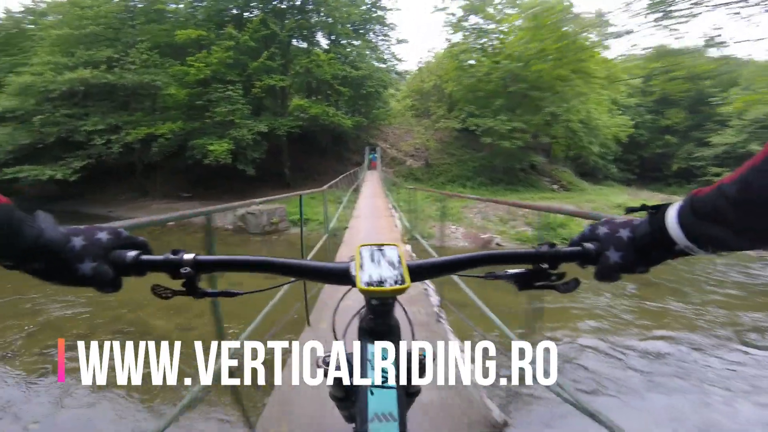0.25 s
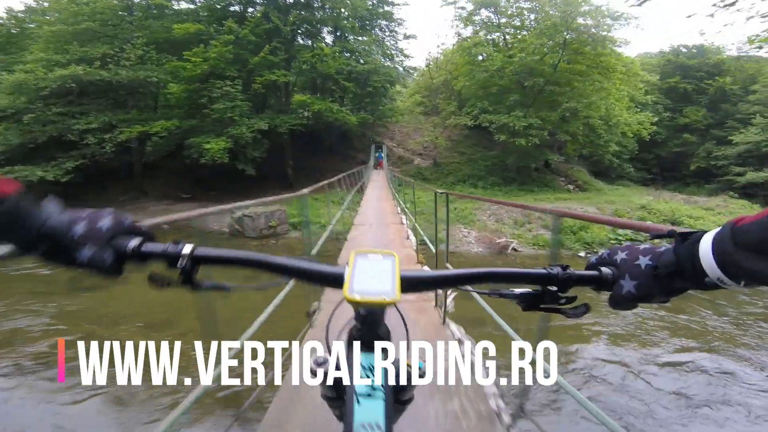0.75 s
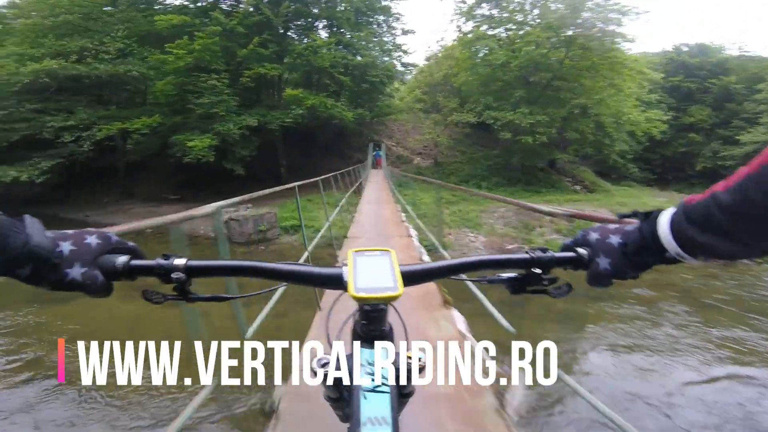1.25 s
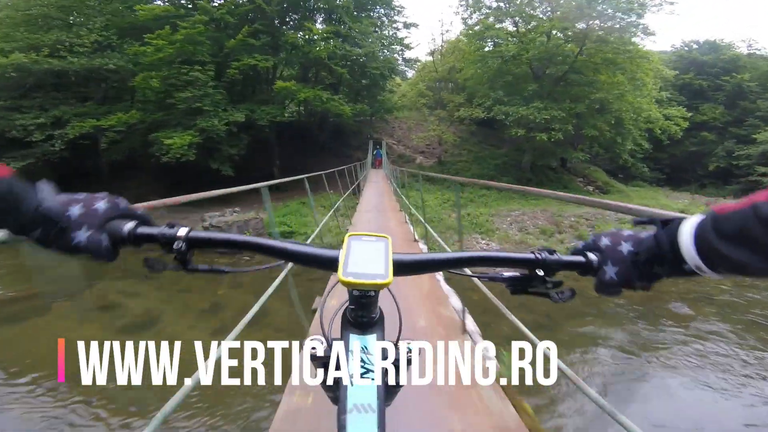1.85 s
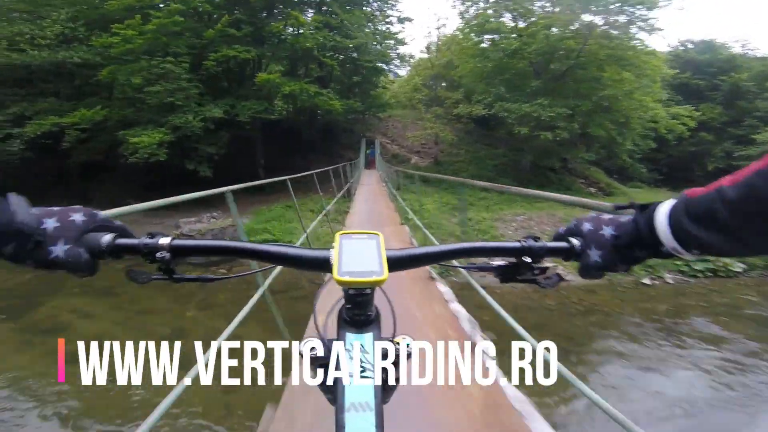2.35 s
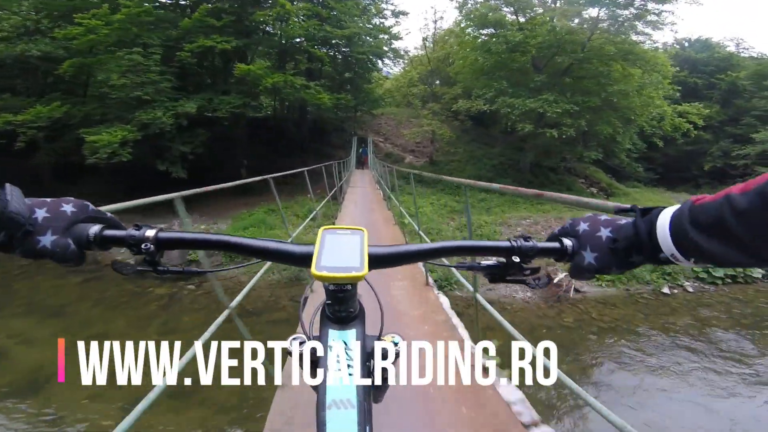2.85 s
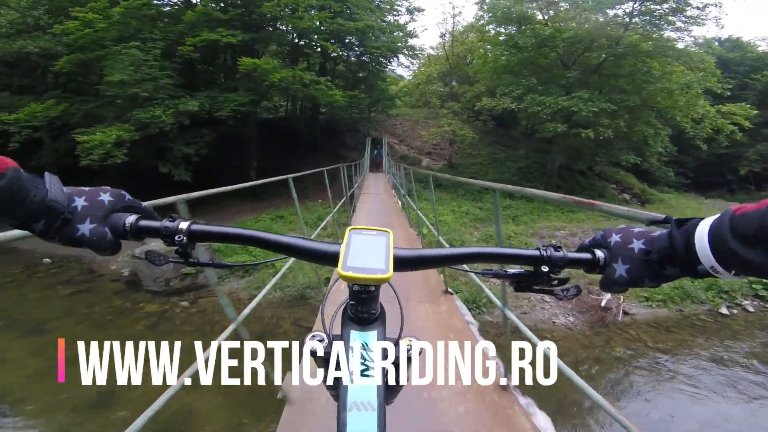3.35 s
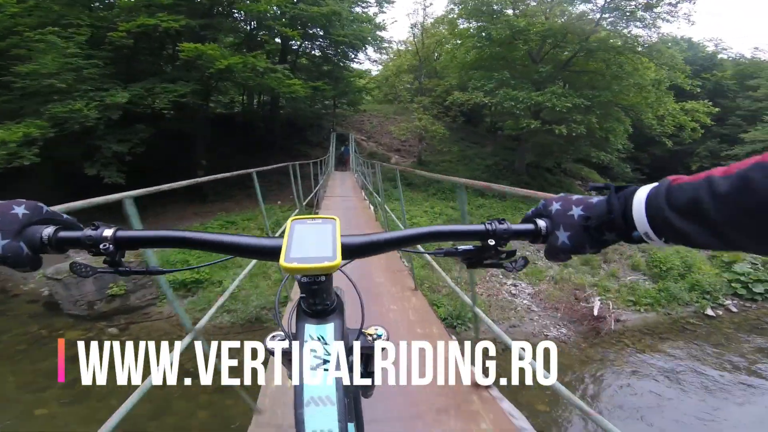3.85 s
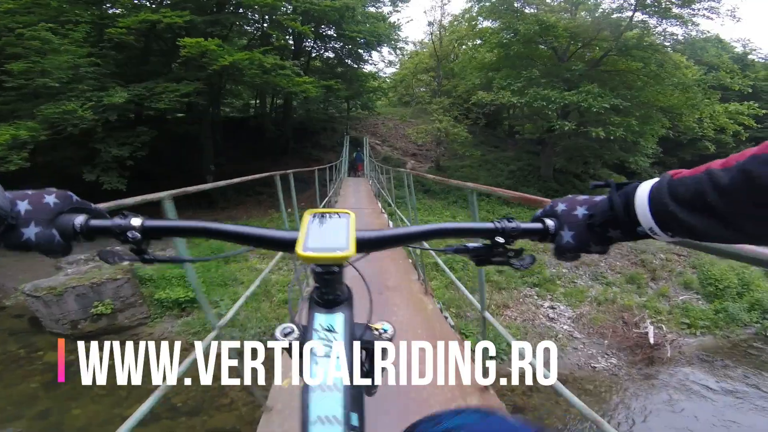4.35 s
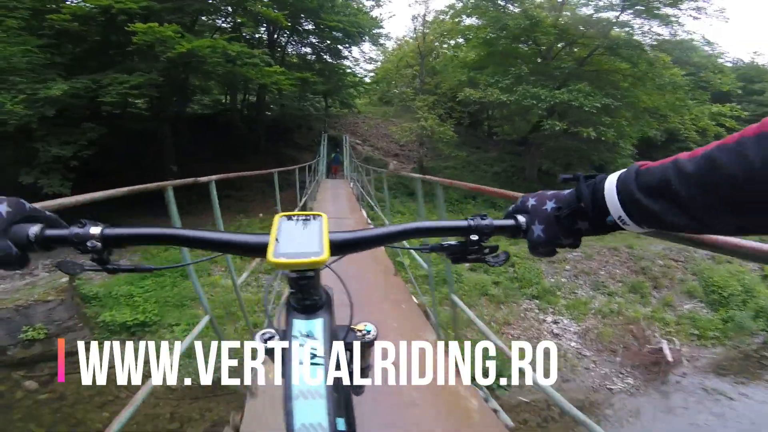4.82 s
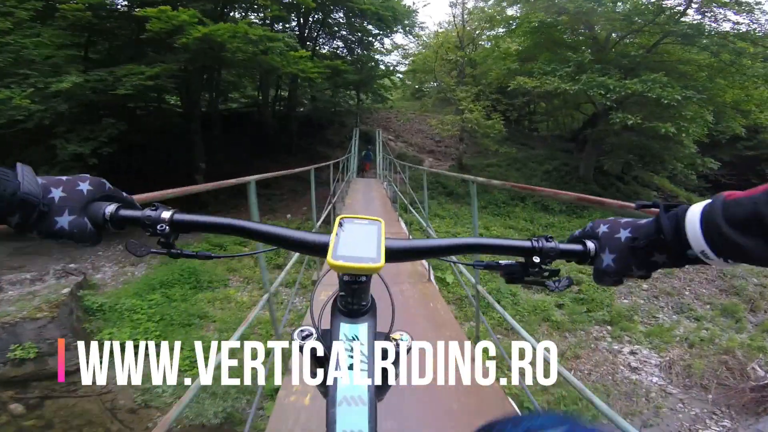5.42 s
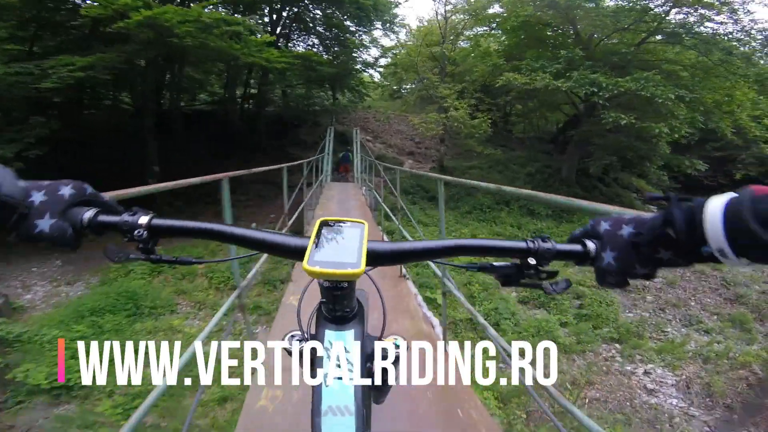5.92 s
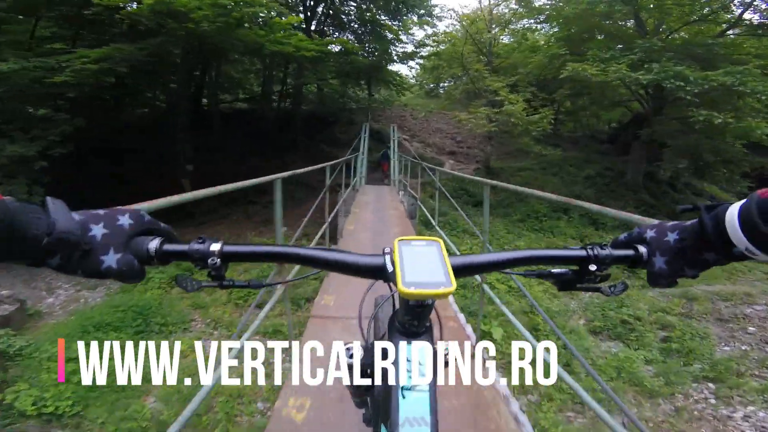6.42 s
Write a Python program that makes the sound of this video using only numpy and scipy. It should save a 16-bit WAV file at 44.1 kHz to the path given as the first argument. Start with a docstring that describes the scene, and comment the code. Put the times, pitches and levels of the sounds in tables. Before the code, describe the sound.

A mountain bike coasts over a loose steel footbridge, freewheel ticking, plates thumping and chain rattling, with two quick ratchet buzzes before the hardest jolts.

```python
"""A mountain bike coasts over the loose steel plates of a footbridge, heard by a boxed camera on the rider.
At first the freewheel ticks while plate joints thump the deck and shake the chain and cables; past four
seconds fast back-pedalling makes it buzz, then the ticking stops. It buzzes briefly again after five seconds,
and the hardest jolts follow. Shaped noise makes tyre rumble, a soft hiss of air and river, and wind throughout.
Ticks and rattles are short noise bursts sent through resonances; snaps and deck booms are dying tones."""
import sys
import numpy as np
from scipy import signal
from scipy.io import wavfile
from scipy.ndimage import uniform_filter1d

SR = 44100
rng = np.random.default_rng(int(sys.argv[2]) if len(sys.argv) > 2 else 0)


def materialize(psi):
    """Save the field psi as 16-bit PCM at rate SR to the path in sys.argv[1].

    A 1-D psi becomes a single channel; in a 2-D psi each row is a channel.
    """
    bounded = np.clip(np.atleast_2d(psi).T, -1, 1)
    quanta = np.round(bounded * 32767).astype(np.int16)
    wavfile.write(sys.argv[1], SR, quanta)


N = 294411

# Levels in the tables are those of each part before the later mix gains and the camera box.
# loudness of a freewheel tick over time: time_s, level_db
TICK_LEVELS = [(0, -41.5), (1.5, -38.5), (1.9, -45), (2.3, -43.5), (3.5, -41), (4.36, -40), (4.39, -35.5),
               (5.43, -37.5)]
# spans with no push on the pedals, in which the ratchet is heard: start_s, end_s
COASTING_SPANS = [(0, 4.4), (5.14, 5.435)]
# the feet rock the pedals; each move starts and ends gently: start_s, length_s, teeth_backwards (count)
PEDAL_MOVES = [(0, .07, -1.2), (.09, .19, 1.05), (.28, .2, -.95), (.43, .27, -3.55), (.73, .135, 1.95),
               (.87, .15, -1.85), (1.02, .19, 1.25), (1.43, .17, -.82), (1.83, .1, .37), (1.93, .19, -2.1),
               (2.13, .15, 1.75), (3.01, .1, .48), (3.48, .2, -1.53), (3.78, .12, -.5), (4.03, .37, 21.9),
               (5.08, .36, 21.14)]
# tone colour of the falling pawls: pitch_hz, level_db
PAWL_COLOUR = [(1500, -23), (3000, -13), (4200, 6.5), (6500, 11.5), (9000, 7.5), (16000, -5)]
# ringing of the wheel hub: pitch_hz, width_hz, level_db
HUB_MODES = [(1627, 75, -4.5), (2096, 540, 8), (3120, 69, -3), (6960, 180, -8)]
# jolts that shake chain and cables: start_s, rattle_peak_db, deck_thump_db, rattle_t60_s (time to fall 60 dB)
JOLTS = [(0.1197, -15, -29, 0.11), (0.2721, -20, -29, 0.12), (0.383, -26, -33.5, .09),
         (0.6839, -7.5, -22.5, 0.11), (0.69, -12.5, -27, 0.088), (0.8585, -23.5, -37, 0.13),
         (1.2987, -15, -30.5, 0.09), (1.4627, -19, -41, 0.043), (1.5793, -8.5, -22.5, 0.1),
         (1.613, -7, -29.5, .11), (1.6674, -9.5, -36, 0.1), (1.694, -19, -28.5, 0.087),
         (1.9001, -26.5, -44, 0.08), (1.9377, -21, -37.5, 0.12), (1.947, -23.5, -43, 0.1),
         (2.0166, -18, -45, 0.082), (2.09, -20.5, -40.5, 0.082), (2.513, -14, -28.5, 0.17),
         (2.53, -20.5, -26.5, 0.13), (2.641, -29, -27, 0.16), (2.6615, -9, -26.5, 0.11),
         (2.7353, -9, -30.5, 0.12), (3.1429, -13.5, -22.5, 0.19), (3.195, -17.5, -40, 0.25),
         (3.213, -22, -30.5, 0.1), (3.23, -25, -30, 0.27), (3.2767, -32, -28.5, 0.59),
         (3.358, -28, -31, .45), (4.578, -40, -40.5, 0.086), (4.697, -10.5, -22.5, 0.14),
         (4.734, -28, -39, 0.23), (4.8258, -13.5, -21.5, 0.18), (4.9, -24, -62, 0.14),
         (4.945, -20, -49, 0.18), (5.0117, -16, -30.5, 0.18), (5.0672, -15.5, -26.5, 0.11),
         (5.1157, -15, -28, 0.14), (5.142, -23.5, -28, 0.25), (5.501, -33, -33, 0.081),
         (5.552, -21.5, -38, 0.11), (5.7051, -6.5, -15, 0.063), (5.7385, -9.5, -18.5, 0.069),
         (5.796, -12, -20.5, 0.037), (5.8178, -5, -15, 0.13), (5.9117, -16, -22.5, 0.13),
         (6.064, -6.5, -18.5, 0.15), (6.145, -22.5, -22, 0.71), (6.225, -26, -32, .15),
         (6.249, -21.5, -27.5, 0.17), (6.292, -24, -42, 0.17), (6.342, -1.5, -14.5, 0.22),
         (6.3891, -19, -19, 0.28), (6.46, -30.5, -49, 0.99), (6.529, -28, -40, 0.27),
         (6.581, -24, -40, 0.1), (6.599, -30, -43, 0.079), (6.6664, -28.5, -37, .15)]
# single sharp snaps of a link on metal: start_s, peak_db, pitch_hz
SNAPS = [(1.603, -7, 5320), (1.6138, -2, 5940), (1.6669, -2, 5560), (4.7015, -24, 5920),
         (5.0653, -10.5, 5740), (5.8252, 1, 6500), (6.4822, -12, 5450)]
# tone colour of the bright rattle: pitch_hz, level_db
RATTLE_COLOUR = [(1500, -14), (3000, 2.5), (4500, -0.5), (9000, 6.5), (16000, 0.5)]
# ringing of chain and frame: pitch_hz, width_hz, level_db
METAL_MODES = [(2730, 110, -12), (5010, 36, -6), (5270, 23, -3), (5620, 82, -12), (5890, 160, 5),
               (6525, 130, 1), (7060, 110, 0)]
# tone colour of the dull clatter: pitch_hz, level_db
CLATTER_COLOUR = [(150, -30), (500, 5), (1200, -0.5), (2800, -2.5), (5000, -11.5), (10000, -17)]
# bending modes of the deck and tyres: pitch_hz, width_hz, level_db
DECK_MODES = [(95.1, 20.3, 9), (137.6, 30, -1), (195.5, 43, -9), (271, 25, -6), (504, 7.2, -14)]
# dull knocks of the frame: start_s, peak_db, pitch_hz, width_hz, t60_s, clean_share (of one clean blow, 0-1)
KNOCKS = [(1.299, -11, 1260, 1600, 0.038, 0.76), (2.06, -31.5, 395, 400, 0.096, 0.53),
          (2.196, -29, 540, 600, 0.19, 0.72), (4.441, -29, 580, 357, 0.19, 0.43),
          (5.378, -17, 2180, 1490, 0.054, 0.73), (5.2, -32, 674, 250, 0.12, 0.23),
          (5.495, -28.5, 600, 242, 0.4, 0.32), (5.5, -34.5, 1280, 260, 0.2, 0.06),
          (5.639, -24, 900, 120, 0.031, 0.1)]
# rolling over time: time_s, tyre_rumble_db, hiss_db
ROLLING_LEVELS = [(0.0, -38.5, -49.5), (0.69, -47, -47), (0.85, -38.5, -53), (1.21, -42, -42),
                  (1.71, -39.5, -52.5), (2.32, -41.5, -54), (2.57, -44.5, -48), (2.69, -40, -45),
                  (3.03, -42, -49), (3.36, -36.5, -75), (3.77, -42, -44), (4.63, -39, -51.5),
                  (4.96, -33.5, -45), (5.62, -39, -48), (5.91, -22.5, -89), (6.68, -35, -71)]
# tone colour of the rumble: pitch_hz, level_db
RUMBLE_COLOUR = [(30, 2), (75, -23), (120, -4), (300, -6), (700, -21), (1500, -26.5), (4000, -37)]
# tone colour of the hiss: pitch_hz, level_db
HISS_COLOUR = [(200, -4.5), (600, -1), (1500, -6), (3000, -8), (4000, -15.5), (5000, -16), (9000, -12),
               (16000, -6)]
# low gusts on the microphone: peak_s, level_db
GUSTS = [(.15, -31), (.3, -44), (.48, -39), (0.719, -29.5), (1.04, -37), (1.62, -42), (1.77, -48),
         (2.099, -43), (2.55, -38), (2.85, -43), (3.16, -35.5), (3.51, -37.5), (3.659, -40), (3.85, -67),
         (4.22, -49), (5.11, -34), (5.35, -38.5), (5.558, -37), (5.73, -28), (5.82, -27), (6.12, -33.5),
         (6.42, -30), (6.55, -49)]
# the camera box favours two cavity peaks and shuts out the top: pitch_hz, level_db
BOX_COLOUR = [(2000, -1), (2800, 0), (4200, -1.5), (4900, 4.5), (5500, 8), (6000, 4), (6450, 8), (7000, 1),
              (8000, -5.5), (10000, -14.5), (11800, -31.5), (13400, -29.5), (16000, -35)]

# Freewheel: the wheel turns the ratchet steadily, and the swish trails the rate of passing teeth
WHEEL_TEETH_PER_S, FIRST_TOOTH = 40.5, -.1
WHIRR_REST_HZ, WHIRR_HZ_PER_TOOTH_RATE, WHIRR_WIDTH_HZ = 1300, 8, 140
WHIRR_LAG_S, WHIRR_DB_AT_120_TEETH_PER_S = .07, 13

# Jolts: the clatter level lies between rattle and thump (share of the thump), plus an offset
CLATTER_SHARE, CLATTER_DB = 0.31, -6.5
# the chain slaps on at random while the deck shudders
SLAPS_PER_S, SLAP_DB, SLAP_T60_S = 70, -11, 0.075
BOOM_SPREAD_DB = 5  # each blow falls elsewhere and favours other modes
BANK_S, BANK_LOW_MODE_DB = 5.6, -8  # near the bank the lowest deck mode weakens
# slow after-shake of the deck: levels relative to the thumps
SHUDDER_T60_S, SHUDDER_RUMBLE_DB, SHUDDER_JINGLE_DB = 1.06, -16, -20.5

BLOW_DAMPING = 1.1  # nepers per cycle of a clean frame knock

# Background
CHAIN_HISS_DB = -43  # at full back-pedalling speed: teeth pass at three times the wheel's own rate
COAST_HISS_DB = -58  # the free ratchet also sizzles between its ticks
CALM_WIND_DB, GUST_RISE_DB_PER_S, GUST_FALL_DB_PER_S = -47.5, 157, 78

BAND_EDGE_HZ = 15950


def freewheel():
    """Each tooth drops the pawls as a tiny noise burst that rings the hub; fast teeth add a rising swish."""
    passed, free = teeth()
    new_tooth = np.diff(np.floor(passed), prepend=-1) > 0
    times = np.flatnonzero(new_tooth & free) / SR
    scatter = rng.standard_normal((len(times), 2))
    tick_db = np.interp(times, *np.transpose(TICK_LEVELS))

    t, envelope = np.arange(2000) / SR, np.zeros(N)
    shape = (1 - np.exp(-t / .001)) * (np.exp(-t / .0028) + .08 * np.exp(-t / .01))
    for at, db, (late, size) in zip(times, tick_db, scatter):
        # each burst starts about 2.2 ms ahead of its tooth and varies a little in time and loudness
        add(envelope, at - .0022 + .0004 * late, gain_of(db + 1.3 * size) * shape)
    clicks = envelope * rng.standard_normal(N)

    teeth_per_s = uniform_filter1d(np.gradient(passed) * SR * free, size=6000)
    lagging_rate = np.roll(teeth_per_s, round(WHIRR_LAG_S * SR))
    whirr_hz = WHIRR_REST_HZ + WHIRR_HZ_PER_TOOTH_RATE * lagging_rate
    whirr = ring(clicks, whirr_hz, WHIRR_WIDTH_HZ) * (teeth_per_s / 120)
    pawls = colour(clicks, PAWL_COLOUR)
    hub = gain_of(-5) * modes(clicks, HUB_MODES)
    return pawls + hub + gain_of(WHIRR_DB_AT_120_TEETH_PER_S) * whirr


def teeth():
    """Teeth passed so far (steady wheel plus pedal moves), and where the ratchet runs free."""
    t, coarse = np.arange(N) / SR, np.arange(0, N + 16, 16) / SR
    moves = np.zeros(len(coarse))
    for start, length, back in PEDAL_MOVES:
        progress = np.clip((coarse - start) / length, 0, 1)
        moves += back * (.5 - .5 * np.cos(np.pi * progress))
    passed = FIRST_TOOTH + WHEEL_TEETH_PER_S * t + np.interp(t, coarse, moves)
    free = sum((t >= start) & (t < end) for start, end in COASTING_SPANS) > 0
    return passed, free


def jolts():
    """A gritty dying rattle, its dull clatter, and a slower thump in which the deck modes boom."""
    t = np.arange(SR // 2) / SR
    shake, clatter, thump_power, booms, snaps = np.zeros((5, N))
    favours = BOOM_SPREAD_DB * rng.standard_normal((len(JOLTS), len(DECK_MODES)))
    favours[:, 0] += BANK_LOW_MODE_DB * (np.array(JOLTS)[:, 0] > BANK_S)
    deck_hz, _, deck_db = np.transpose(DECK_MODES)
    tones = np.sin(2 * np.pi * deck_hz[:, None] * t)
    for (s, db, thump_db, t60), favour_db in zip(JOLTS, favours):
        envelope = gain_of(-60 * t / t60) * (1 - np.exp(-t / 0.0015))
        clatter_db = CLATTER_DB + db + CLATTER_SHARE * (thump_db - db)
        add(shake, s, gain_of(db) * envelope)
        add(clatter, s, gain_of(clatter_db) * envelope)
        # thumps add as powers, so their decibels are doubled here and the root is taken below
        add(thump_power, s, gain_of(2 * thump_db - 120 * t / 0.5) * (1 - np.exp(-t / 0.0004)))
        add(booms, s, gain_of(thump_db - 60 * t / 0.67) * (gain_of(deck_db + favour_db) @ tones))

    slap_starts = rng.random(N) < SLAPS_PER_S / SR
    hits = slap_starts * gain_of(SLAP_DB + 1.2 * rng.standard_normal(N)) * shudder()
    slaps = signal.oaconvolve(hits, gain_of(-60 * t / SLAP_T60_S))[:N]
    for s, db, hz in SNAPS:
        add(snaps, s, gain_of(db) * np.sin(2 * np.pi * hz * t) * np.exp(-t / 0.00063))

    # many links striking
    grit = evened(rng.standard_normal((2, N)) * lumps(per_s=420, spread_db=3))
    strikes = gain_of(-14) * (shake + slaps) * grit[0] + gain_of(-11.0) * snaps
    rattle = colour(strikes, RATTLE_COLOUR) + gain_of(-15.5) * modes(strikes, METAL_MODES)
    dull = colour((clatter + gain_of(-14.5) * slaps) * grit[1], CLATTER_COLOUR)
    deck = gain_of(-2.0) * np.sqrt(thump_power) * deck_noise() + gain_of(-20) * booms
    return rattle + gain_of(-1.35) * dull + deck


def shudder():
    """Amplitude of the deck's slow after-shake: the powers of all thumps add and die away."""
    power = np.zeros(N)
    for s, _, thump_db, _ in JOLTS:
        power[round(s * SR)] += gain_of(2 * thump_db)
    return np.sqrt(signal.lfilter([1], [1, -gain_of(-120 / (SHUDDER_T60_S * SR))], power))


def deck_noise():
    """Broad rumble with the bending modes of the deck and tyres standing out."""
    noise = rng.standard_normal(N)
    near_bank = np.clip((np.arange(N) / SR - BANK_S) / .2, 0, 1)
    lowest = gain_of(BANK_LOW_MODE_DB * near_bank) * modes(noise, DECK_MODES[:1])
    bending = lowest + modes(noise, DECK_MODES[1:])
    return evened(evened(colour(noise, RUMBLE_COLOUR)) + gain_of(5.0) * evened(bending))


def knocks():
    """The frame gives a quickly damped blow and a grainy puff of noise around its pitch."""
    t, out = np.arange(8000) / SR, np.zeros(N)
    for s, db, hz, width, t60, clean in KNOCKS:
        puff = evened(ring(ring(rng.standard_normal(len(t)), hz, width), hz, 2.0 * width))
        dying_puff = puff * gain_of(-60 * t / t60)
        blow = -1.9 * np.sin(2 * np.pi * hz * t) * np.exp(-t * hz * BLOW_DAMPING)
        add(out, s, gain_of(db) * (clean * blow + 1.22 * (1 - clean) * dying_puff))
    return out


def rolling():
    """Lumpy tyre rumble and a fluttering hiss that swell with shudder, hiss also with pedalling; plus wind."""
    passed, free = teeth()
    backwards = np.clip(np.gradient(passed) * SR / WHEEL_TEETH_PER_S - 1, 0, 2) / 2 * free  # 0-1
    shaking = uniform_filter1d(shudder(), size=2000)
    low = np.hypot(gain_of(curve(ROLLING_LEVELS, axis=1)), gain_of(SHUDDER_RUMBLE_DB) * shaking)
    rumble = low * deck_noise() * lumps(per_s=6.7, spread_db=2.0)

    high = gain_of(curve(ROLLING_LEVELS, axis=2))
    high = high + gain_of(SHUDDER_JINGLE_DB) * shaking
    high = high + gain_of(CHAIN_HISS_DB) * backwards
    high = high + gain_of(COAST_HISS_DB) * uniform_filter1d(free * 1., size=800)
    fluttering = rng.standard_normal(N) * lumps(per_s=70, spread_db=1.2)
    hiss = evened(colour(fluttering, HISS_COLOUR))

    buffet = evened(ring(ring(rng.standard_normal(N), 31.0, 25), 50.0, 35))
    return rumble + high * hiss + gusts() * buffet


def gusts():
    """Wind level: a calm floor and peaks that rise fast and fall slower."""
    t = np.arange(0, N + 64, 64) / SR
    peaks = [db - np.maximum(GUST_RISE_DB_PER_S * (s - t), GUST_FALL_DB_PER_S * (t - s)) for s, db in GUSTS]
    wind_db = np.maximum(np.max(peaks, axis=0), CALM_WIND_DB)
    return gain_of(np.interp(np.arange(N) / SR, t, wind_db))


def gain_of(db):
    """Turns decibels into amplitude."""
    return 10 ** (np.asarray(db) / 20)


def evened(x):
    """Scales a sound to an average strength (rms) of 1."""
    return x / np.sqrt(np.mean(x ** 2) + 1e-20)


def curve(points, axis):
    """Draws straight lines between the rows of one table column, sample by sample."""
    rows = np.array(points)
    return np.interp(np.arange(N) / SR, rows[:, 0], rows[:, axis])


def add(mix, s, sound):
    """Mixes a sound in at s seconds."""
    part = mix[max(round(s * SR), 0):][:len(sound)]
    part += sound[:len(part)]


def colour(x, points, size=8192):
    """Tone filter without pre-echo: its phase is the Hilbert transform of the log gain."""
    f, db = np.transpose(points)
    hz = abs(np.fft.fftfreq(size, 1 / SR))
    log_gain = np.log(gain_of(np.interp(np.log(hz + 1), np.log(f), db)))
    taps = np.fft.ifft(np.exp(np.conj(signal.hilbert(log_gain)))).real[:size // 2]
    return signal.oaconvolve(x, taps)[..., :N]


def ring(x, hz, width):
    """A resonance of gain 1, steady or moving: shift down to zero pitch, smooth, shift back."""
    turn = np.exp(2j * np.pi * np.cumsum(hz * np.ones(len(x))) / SR)
    r = np.exp(-np.pi * width / SR)
    return 2 * (turn * signal.lfilter([1 - r], [1, -r], x / turn)).real


def modes(x, table):
    """Sum of resonances, each passing equal power of flat noise before its own level."""
    return sum(gain_of(db) * ring(x, hz, width) * np.sqrt(SR / (2 * np.pi * width))
               for hz, width, db in table)


def lumps(per_s, spread_db):
    """Random gain that wanders at about per_s times a second."""
    steps = rng.standard_normal(N // 32 + 2)  # one step every 32 samples
    steps = evened(signal.lfilter([1], [1, -np.exp(-2 * np.pi * per_s * 32 / SR)], steps))
    return gain_of(spread_db * np.interp(np.arange(N) / 32, np.arange(len(steps)), steps))


def scene():
    """All sources added together in one channel."""
    return (freewheel() + jolts() + knocks() + rolling())[None]


def record(dry):
    """The colour of the camera box, a soft clip of the highest peaks, then the band limit."""
    boxed = colour(dry[0], BOX_COLOUR)[None]
    clipped = .8 * np.tanh(boxed / .8)
    band_limit = signal.firwin(511, BAND_EDGE_HZ, window=("kaiser", 9), fs=SR)
    return signal.oaconvolve(clipped, band_limit[None], "same")


dry = scene()
out = record(dry)
materialize(out)
```